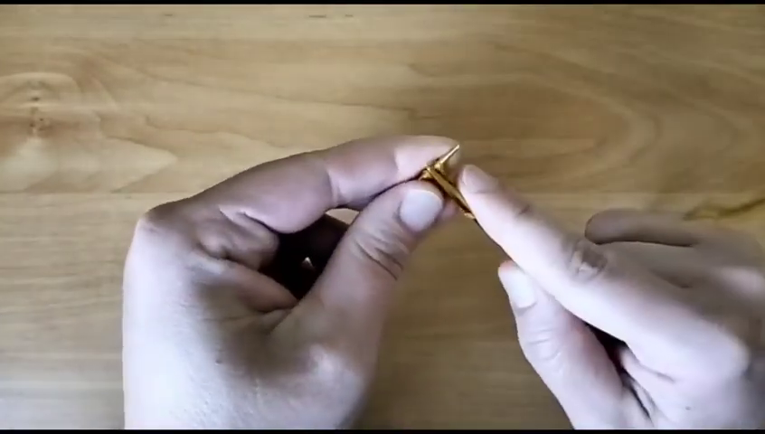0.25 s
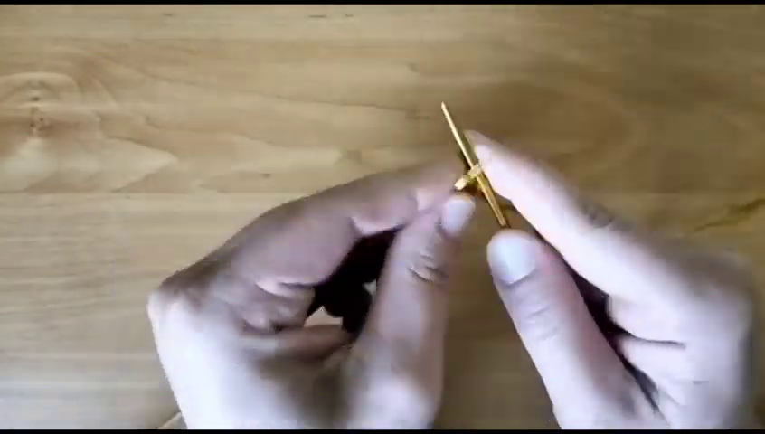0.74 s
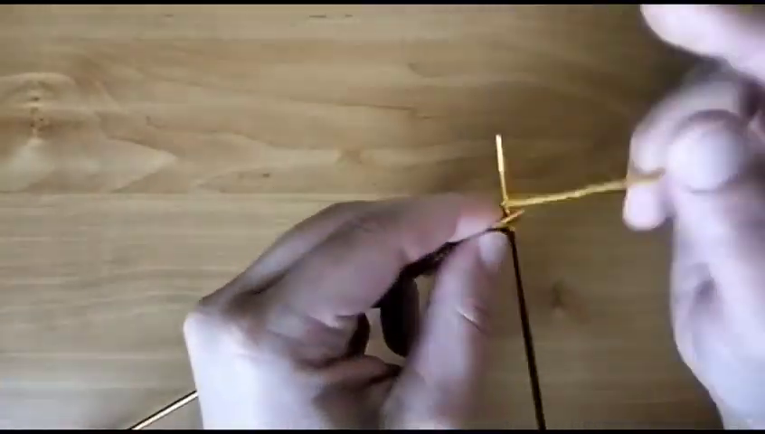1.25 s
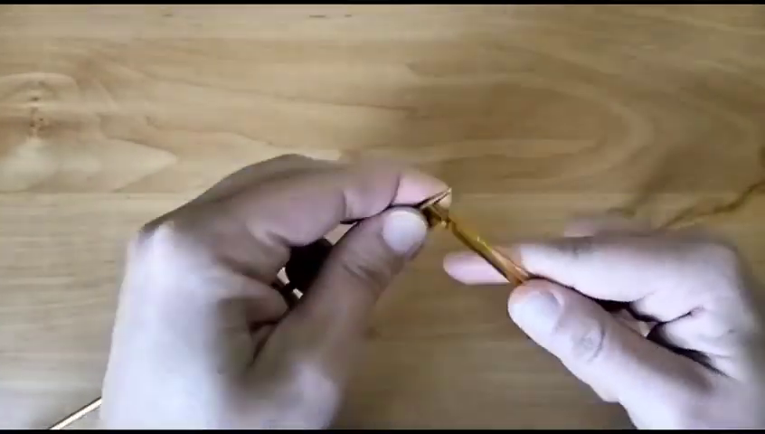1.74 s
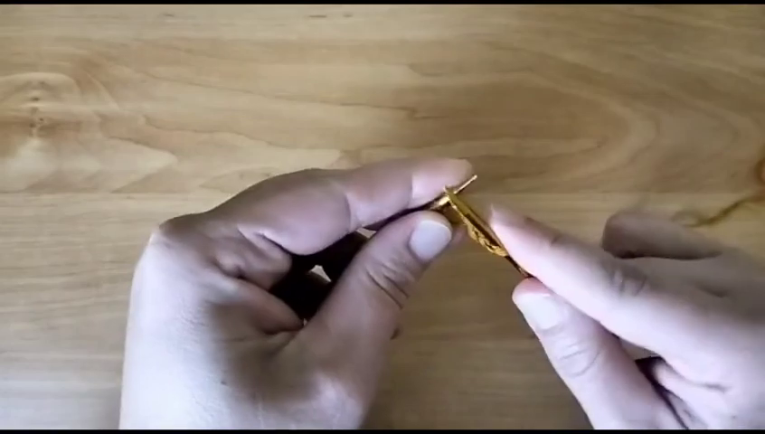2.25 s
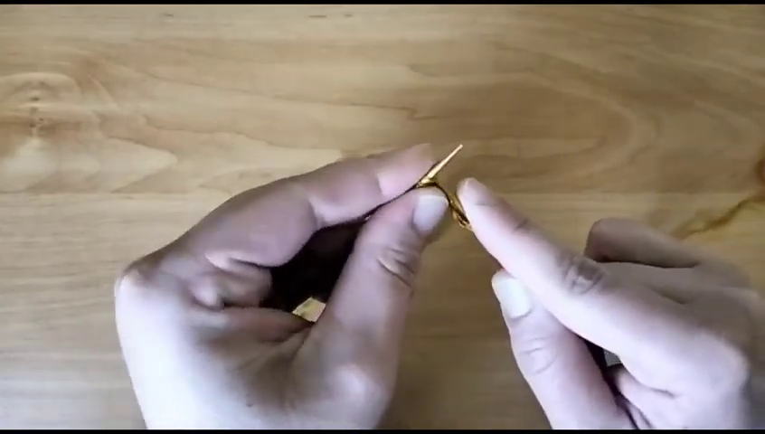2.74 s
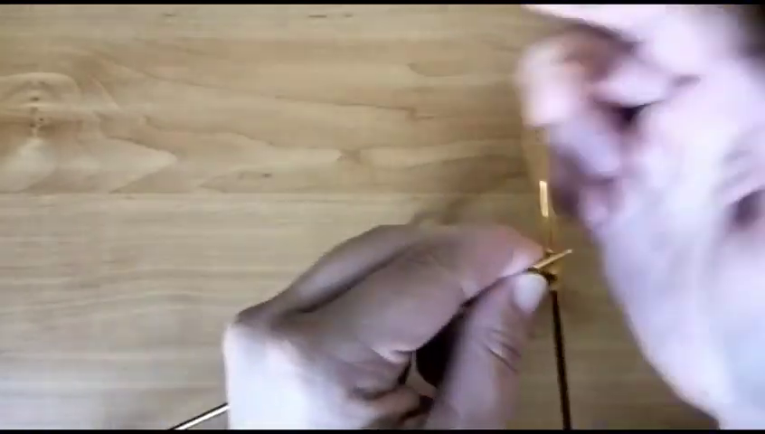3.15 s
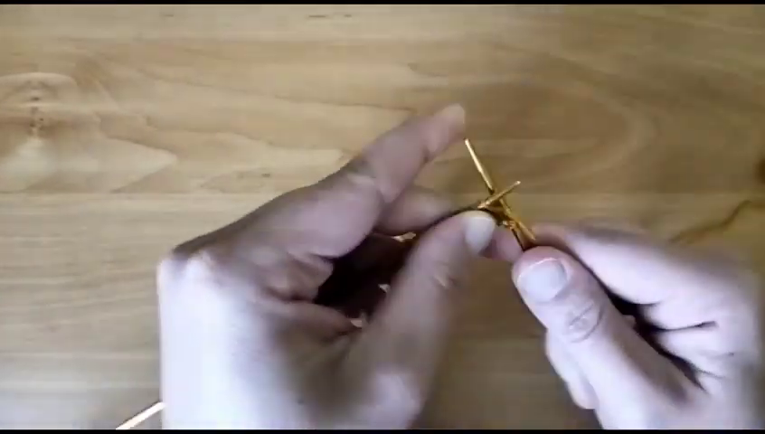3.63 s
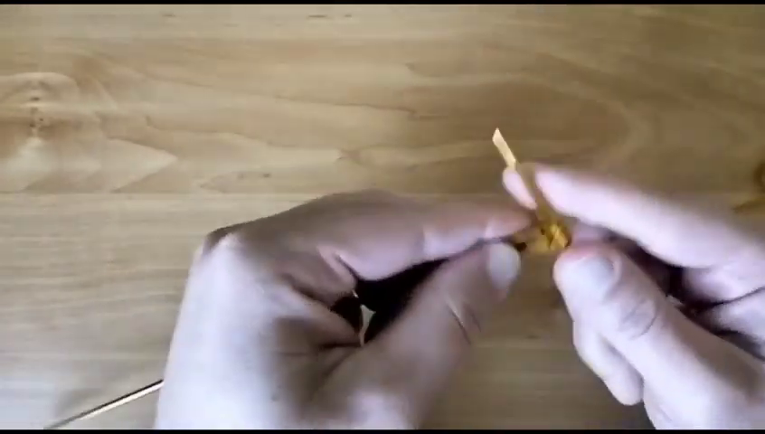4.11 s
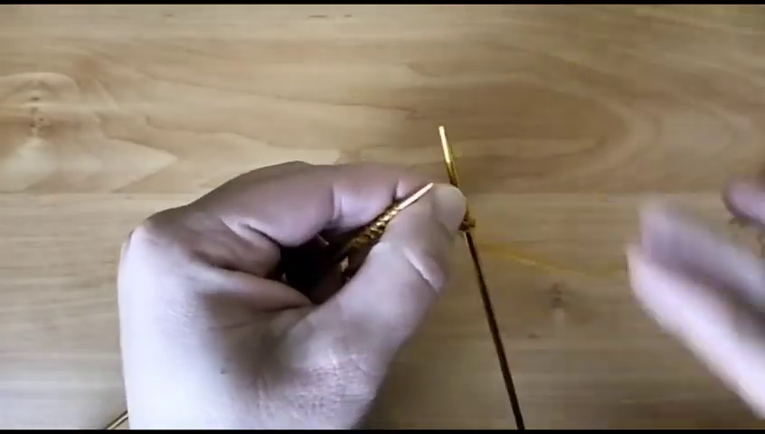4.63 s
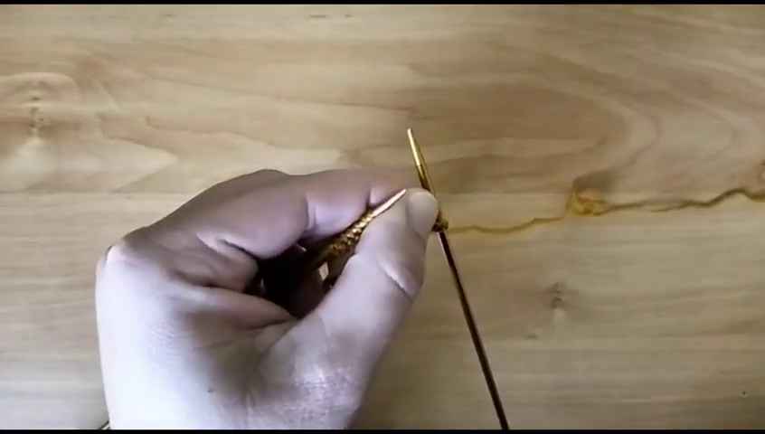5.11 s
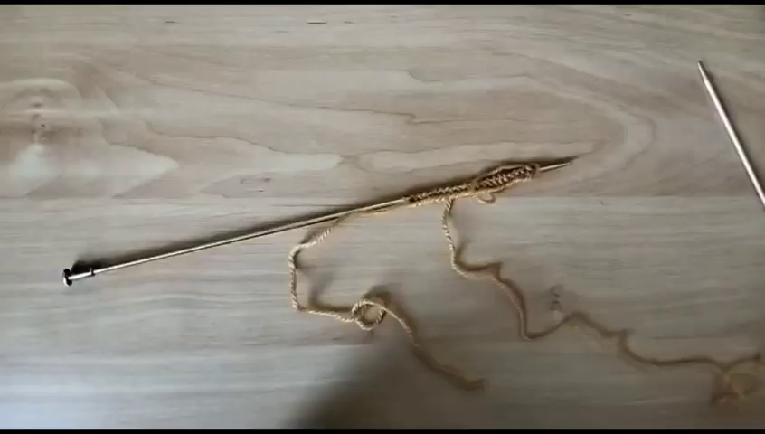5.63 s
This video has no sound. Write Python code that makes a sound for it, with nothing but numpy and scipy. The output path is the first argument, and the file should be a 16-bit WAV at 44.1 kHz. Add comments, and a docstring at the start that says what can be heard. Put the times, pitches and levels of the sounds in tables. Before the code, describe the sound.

Sparse bright needle clicks, short dry yarn rubs and a dull bump on the microphone stand, heard close over a wooden table.

```python
"""Two knitting needles click together over a wooden table: each blow is an impulse, dispersed along a rod
and filtered by resonances of needles, table and room. Yarn rubs, squeaks and snags by stick-slip friction;
wool brushes the skin and fingers shift as shaped noise, beside a short dull rattle. A hand bumps the
microphone stand, exciting damped modes, and leans on it, which sounds as a low wavering tone. Table
reflections and the diffuse field of a bare room answer clicks and rubbing, over faint room noise."""
import sys
import numpy as np
from scipy import signal
from scipy.fft import rfft, irfft
from scipy.io import wavfile
from scipy.ndimage import uniform_filter1d

SR = 44100
rng = np.random.default_rng(int(sys.argv[2]) if len(sys.argv) > 2 else 0)


def dump(signal):
    """Clip the signal to [-1, 1] and save it as 16-bit WAV at the path in sys.argv[1]."""
    limited = np.clip(np.atleast_2d(signal).T, -1, 1)
    pcm = np.round(limited * 32767).astype(np.int16)
    wavfile.write(sys.argv[1], SR, pcm)


N = 258967
TIME = np.arange(N) / SR  # s
HZ = np.fft.rfftfreq(8192, 1 / SR)  # frequency grid of the colour filters


def undb(db):
    """Decibel law: amplitude gain is ten to the power of level over twenty."""
    return 10 ** (np.asarray(db) / 20)


def unit(x):
    """Normalisation by mean power: scale to rms 1."""
    return x / np.sqrt(np.mean(x ** 2) + 1e-20)


def along(points, hz):
    """Logarithmic pitch scale: interpolate (frequency [Hz], value) points on a log axis."""
    f, value = np.transpose(points)
    return np.interp(np.log(hz + 1), np.log(f), value)


def convolve(x, response):
    """Linear superposition: pass a sound through an impulse response, keeping its length."""
    full = signal.fftconvolve(np.atleast_2d(x), np.atleast_2d(response), axes=1)
    return full[:, :np.shape(x)[-1]]


def colour(x, points, boost_db=0):
    """Minimum-phase filtering: a causal response made from a level outline by folding its cepstrum."""
    cepstrum = irfft(np.log(undb(along(points, HZ) + boost_db)))
    half = len(cepstrum) // 2
    cepstrum[1:half] *= 2
    cepstrum[half + 1:] = 0
    return convolve(x, irfft(np.exp(rfft(cepstrum))))


def band(x, lo_hz, hi_hz, order=2):
    """Band limitation: a Butterworth band-pass."""
    edges = [lo_hz, min(hi_hz, SR / 2 - 100)]
    return signal.sosfilt(signal.butter(order, edges, "band", fs=SR, output="sos"), x)


def spread(size, apart_hz):
    """Interaural coherence: stereo noise whose bass is alike on both sides and whose treble is not."""
    mid, side = rfft(rng.standard_normal((2, size)))
    hz = np.fft.rfftfreq(size, 1 / SR)
    alike = 1 / (1 + (hz / apart_hz) ** 2)
    opposed = np.array([[1], [-1]]) * side * np.sqrt(1 - alike)
    return irfft(mid * np.sqrt(1 + alike) + opposed, size) / np.sqrt(2)


def walk(rate):
    """Random modulation: straight lines join normal random values, `rate` of them a second."""
    knots = rng.standard_normal(size=2000)
    return np.interp(TIME * rate, np.arange(len(knots)), knots)


def swell(length, size):
    """Stroke envelope: a quick rise, a broad top and a slower fall within a length of time."""
    progress = np.clip(TIME[:size] / length, 0, 1)
    return np.abs(np.sin(np.pi * progress ** 0.3)) ** 0.54


def hold(s, length, rise_s, fall_s):
    """Attack and release: a straight rise, a hold until the length is over, then exponential decay."""
    rise = np.clip((TIME - s) / rise_s, 0, 1)
    return rise * np.exp(-np.maximum(TIME - s - length, 0) / fall_s)


def add(track, s, sound):
    """Superposition of events: mix a sound in at a time."""
    start = max(int(s * SR), 0)
    part = np.atleast_2d(sound)[:, :N - start]
    track[:, start:start + part.shape[1]] += part


def bend(x, lag_s):
    """Dispersion of bending waves in a thin rod: treble arrives first, bass later (lag_s at 2 kHz)."""
    hz = np.fft.rfftfreq(len(x), 1 / SR)
    return irfft(rfft(x) * np.exp(-4j * np.pi * lag_s * np.sqrt(2000 * hz)), len(x))


# resonances of the whole sound, from needles, table and room:
# (frequency [Hz], width [Hz], relative level [dB])
RESONANCES = [(123.5, 15, 4.5), (260.5, 21, 8), (417, 4.8, 0), (672.3, 41, -2.5), (978, 12, 1.5),
              (1209, 45, 2), (1510, 7.3, -3), (1603, 34, -0.5), (1923, 50, -2), (2137, 50, 1.5),
              (2300, 76, 0.5), (2454, 44, -0.5), (2887, 190, -8.5), (3070, 18, -14), (3147, 35, -5.5),
              (3363, 30, 0), (3765, 130, -6), (4746, 11, -3), (5080, 44, -7)]


def ring(ring_db):
    """Resonance: gain in dB from summed Lorentzian power peaks standing on a flat response."""
    peaks = 0
    for hz, width, db in RESONANCES:
        peaks = peaks + undb(db + ring_db) ** 2 / (1 + (2 * (HZ - hz) / width) ** 2)
    return 10 * np.log10(1 + peaks)


# needle clicks: (time [s], level [dB], hollow body level [dB], bright snap level [dB],
# left minus right [dB], level sent to the room [dB], favoured pitch [Hz], ring level [dB]);
# body, snap and room levels are relative to the click
CLICKS = [(0.781, -26.5, -23.5, -26, 0.5, -0.5, 2340, 16.5),
          (1.0592, -10.5, -22.5, -21, 2.5, 2.5, 1620, 11), (1.1554, -16.5, -17, -17, 0, 0.5, 2100, 6.5),
          (2.003, -19, -26, -20, -1, -3.5, 2980, 5), (2.9655, -35, -24, -35, 2, -2, 2280, 14.5),
          (3.1939, -11, -21, -18.5, 2.5, 2.5, 2320, 12.5), (3.277, -17.5, -17.5, -25, 0.5, 3.5, 2150, 6),
          (4.054, -17, -20, -22.5, -2, -0.5, 3100, 5), (4.4233, -11.5, -26.5, -24, -1, -2.5, 1800, 7.5),
          (4.645, -10.5, -22.5, -18, 2, -0.5, 2190, 14.5), (4.7632, -17, -20, -18.5, -0.5, -1, 3400, 6.5),
          (4.796, -23, -22, -30, -1, -3.5, 3000, 0)]
# spectral outline of a click: (frequency [Hz], level [dB])
CLICK_COLOUR = [(100, -12.5), (250, -13), (500, -4.5), (1000, -4), (1600, -2.5), (2300, -2), (3300, -3),
                (5000, -8.5), (6500, -15), (8300, -23), (10500, -16.5), (12500, -23), (15500, -33.5)]
SLIDE_S = 0.0073  # the tip slides this long before it slips


def needles(mid_db=-13, snap_db=-1, beam_db=-1, scrape_db=-12, scrape_s=0.0038,
            favour_db=2.5, favour_octaves=0.24, size=3000):
    """Impact excitation: a tip slides, slips and strikes; returns the sounds to the table and to the walls."""
    near, far, t = np.zeros((2, N)), np.zeros((1, N)), TIME[:size]
    for s, db, body, snap, pan_db, room_db, favoured_hz, ring_db in CLICKS:
        scrape, slide = rng.standard_normal((2, size))
        strike = bend(unit(signal.unit_impulse(size)), lag_s=0.0008056)
        push = strike + undb(scrape_db) * unit(scrape * np.exp(-t / scrape_s))
        # the point of contact favours one range of pitch; a tight grip damps the ring
        octaves_away = np.log2((HZ + 1) / favoured_hz)
        contact = favour_db * np.exp(-(octaves_away / favour_octaves) ** 2)
        blow = colour(push, CLICK_COLOUR, ring(ring_db) + contact)
        # where the needle is held decides how hollow and how bright the click is
        hollow = undb(db + body) * unit(band(blow, 90, 900))
        middle = undb(db + mid_db) * unit(band(blow, 1200, 5200))
        bright = undb(db + snap + snap_db) * unit(band(blow, 5200, SR / 2))
        click = hollow - middle + bright  # neighbouring bands have opposite polarity
        # the bright snap beams at the microphone more than at the walls
        beam = undb(beam_db) * bright
        add(near, s, (click + beam) * undb(np.array([[pan_db], [-pan_db]]) / 2))
        add(far, s, click * undb(room_db))
        # friction swells up to the slip
        rise = (t / SLIDE_S) ** 2 * (t < SLIDE_S)
        add(near, s - SLIDE_S, undb(db + mid_db) * unit(colour(slide, CLICK_COLOUR)) * rise)
    return near, far


# yarn strokes along the needles: (time [s], length [s], level [dB], brightness [dB/octave])
STROKES = [(0, 0.052, -35.5, 2.5), (0.047, 0.064, -37.5, -0.5), (.34, 0.038, -55.5, -10),
           (0.835, 0.079, -51.5, -7), (0.899, 0.04, -37.5, 1), (1.278, 0.051, -36.5, 1.5),
           (1.322, 0.14, -39.5, -1), (1.391, 0.065, -39.5, -1), (1.461, 0.13, -45, -2.5),
           (1.611, 0.02, -51.5, -1), (3.446, 0.24, -44, 3), (3.691, 0.038, -39.5, 0.5),
           (4.993, 0.035, -54, -1.5)]
# spectral outline of the rubbing: (frequency [Hz], level [dB])
YARN_COLOUR = [(100, -26.5), (250, -17), (500, -9), (1000, -0.5), (1600, 0.5), (2300, 0.5), (3200, -5),
               (4500, -12.5), (6500, -24), (15000, -32)]


def yarn(grain_db=5.0, catch_db=3.0, ring_db=4, size=12000):
    """Stick-slip friction: fibres give dense, tiny, uneven pushes to the same resonances as the clicks."""
    out, resonance = np.zeros((1, N)), ring(ring_db)
    octaves = np.log2(np.clip(HZ, 300, 8000) / 2000)  # brightness tilts about 2 kHz
    for s, length, db, bright_db in STROKES:
        grain = undb(grain_db * np.minimum(rng.exponential(size=size), 5))
        slips = rng.standard_normal(size) * grain
        rub = unit(colour(slips, YARN_COLOUR, resonance + bright_db * octaves))
        add(out, s, undb(db) * swell(length, size) * rub)
    return out * undb(catch_db * walk(81))


# faint squeaks of tight yarn: (time [s], length [s], level [dB], start pitch [Hz], end pitch [Hz])
SQUEAKS = [(0.192, 0.11, -59.5, 2092, 1815), (1.536, 0.123, -54, 958, 1004)]


def squeaks(waver=0.021, stutter_db=4, size=12000):
    """Friction-driven oscillation: tight yarn sings on the metal as a gliding, wavering, stuttering sine."""
    out = np.zeros((1, N))
    for s, length, db, start_hz, end_hz in SQUEAKS:
        glide = np.interp(TIME[:size], [0, length], [start_hz, end_hz])
        hz = glide * (1 + waver * walk(160)[:size])
        tone = np.sin(2 * np.pi * np.cumsum(hz) / SR)
        add(out, s, undb(db) * swell(length, size) * tone)
    return out * undb(stutter_db * walk(83))


# single fibres snagging on a tip: (time [s], level [dB])
SNAGS = [(0.904, -56.5), (1.734, -63), (2.165, -59), (2.981, -53.5), (3.699, -61), (3.864, -60),
         (4.135, -49.5), (4.182, -51.5)]
# spectral outline of wool fibres, for snags and brushing: (frequency [Hz], level [dB])
FIBRE_COLOUR = [(1000, -29.5), (4000, -8.5), (8000, -6.5), (11000, -1), (13500, -2), (15500, -4)]


def snags(decay_s=.003, size=2048):
    """Sudden release of tension: a fibre catches on a tip and lets go with a thin, decaying tick."""
    out = np.zeros((1, N))
    for s, db in SNAGS:
        burst = rng.standard_normal(size) * np.exp(-TIME[:size] / decay_s)
        add(out, s, undb(db) * unit(colour(burst, FIBRE_COLOUR)))
    return out


# fingers shifting on the work: (time [s], level [dB], length [s], centre pitch [Hz])
SHIFTS = [(0.179, -62.5, 0.16, 186), (0.244, -66, 0.072, 280), (0.331, -68.5, 0.17, 277),
          (.47, -60.5, 0.081, 140), (0.644, -55, 0.039, 558), (0.65, -44.5, 0.043, 188),
          (0.825, -48.5, .06, 213), (2.27, -52.5, 0.068, 437), (2.733, -66, 0.082, 900),
          (2.806, -52, 0.064, 221), (3.089, -65, 0.081, 170), (3.331, -37.5, 0.33, 154),
          (3.463, -38.5, 0.13, 450), (4.664, -48, 0.12, 130), (4.992, -60, 0.063, 502)]


def fingers(ratio=1.55, size=12000):
    """Band-limited friction noise: soft, low scuffs as the grip changes, each 0.27 s at most."""
    out = np.zeros((1, N))
    for s, db, length, hz in SHIFTS:
        scuff = unit(band(rng.standard_normal(size), hz / ratio, hz * ratio, order=3))
        add(out, s, undb(db) * swell(length, size) * scuff)
    return out


# short dull rattles: (time [s], level [dB])
RATTLES = [(5.711, -46.5)]
# spectral outline of a rattle: (frequency [Hz], level [dB])
RATTLE_COLOUR = [(100, -26), (400, 0), (1000, 5), (2000, -7.5), (4000, -19), (8000, -28), (15000, -27)]


def rattles(decay_s=0.016, length_s=0.0218, size=2048):
    """Exponential decay, truncated: a short dull rattle of noise decays and ends abruptly."""
    out, t = np.zeros((2, N)), TIME[:size]
    stop = np.clip((length_s - t) * 1000, 0, 1)  # fades over the last millisecond
    for s, db in RATTLES:
        rattle = spread(size, apart_hz=1800) * np.exp(-t / decay_s) * stop
        add(out, s, undb(db) * unit(colour(rattle, RATTLE_COLOUR)))
    return out


# wool brushing over the fingers as the hands move: (time [s], length [s], level [dB])
BRUSHES = [(0.0, 0.26, -74), (0.89, 0.19, -64), (1.25, 0.62, -71.5), (1.78, 0.16, -67.5), (2.075, .1, -53),
           (2.31, .12, -77), (2.98, 0.34, -66.5), (3.46, 0.41, -67), (3.87, .14, -71), (4.12, 0.15, -69),
           (4.95, 0.61, -76)]
# each brush starts quickly and fades over its length as the hand slows
BRUSH_RISE_S, BRUSH_FADE_DB = 0.015, -10.5


def fibres(grain_db=3.5, flicker_db=2.0):
    """Broadband friction noise: wool on skin gives a thin, grainy hiss for each move of the hands."""
    grain = undb(grain_db * np.minimum(rng.exponential(size=N), 6))
    hiss = rng.standard_normal((2, N)) * grain
    pressure = 0
    for s, length, db in BRUSHES:
        fade_db = BRUSH_FADE_DB * np.clip((TIME - s) / length, 0, 1)
        pressure = pressure + undb(db + fade_db) * hold(s, length, BRUSH_RISE_S, BRUSH_RISE_S)
    return unit(colour(hiss, FIBRE_COLOUR)) * pressure * undb(flicker_db * walk(44))


# bumps on the stand: (time [s], level [dB], push length [s])
BUMPS = [(0.663, -59, 0.0088), (1.062, -52.5, 0.0017), (3.336, -35, 0.0032), (3.459, -25, 0.0045),
         (3.81, -43, 0.013), (4.15, -52, 0.0093), (4.655, -45.5, 0.0052), (4.719, -50, 0.0051)]
# modes of the stand: (frequency [Hz], decay time T60 [s], relative level [dB])
STAND_MODES = [(79.87, 0.52, 6), (98, 0.18, 4.5), (115, 0.45, 3.5), (213.2, 0.32, 0.5)]
# the hand leans on the stand: (time [s], length [s], level [dB])
LEANS = [(3.457, 0.17, -26.5), (3.689, 0.058, -40.5), (3.785, .13, -52), (4.116, 0.082, -46)]
# the shudder builds while the hand leans and dies once it lets go
SHUDDER_HZ, SHUDDER_RISE_S, SHUDDER_FALL_S = 46.4, 0.025, 0.025


def stand(waver=0.035, size=22000):
    """Modal vibration: soft half-sine pushes ring damped modes; a lower shudder sounds while the hand leans."""
    out, t = np.zeros((1, N)), TIME[:size]
    modes = 0
    for hz, t60, db in STAND_MODES:
        modes = modes + undb(db) * np.exp(-np.log(1000) * t / t60) * np.sin(2 * np.pi * hz * t)
    for s, db, push_s in BUMPS:
        push = np.sin(np.pi * np.clip(t / push_s, 0, 1))
        add(out, s, undb(db) * convolve(modes, push / push.sum()))
    phase = 2 * np.pi * np.cumsum(SHUDDER_HZ * (1 + waver * walk(25))) / SR
    leaning = 0
    for s, length, db in LEANS:
        leaning = leaning + undb(db) * hold(s, length, SHUDDER_RISE_S, SHUDDER_FALL_S)
    return out + np.sqrt(2) * np.sin(phase) * leaning


# first echoes from the table and things near by: (left delay [ms], right delay [ms], relative level [dB])
ECHOES = [(2.2066, 2.273, -0.5), (2.648, 2.5, -13.5), (5.239, 5.38, -6), (8.48, 6.6, -17),
          (23.42, 9.3, -15.5)]


def near_field(direct_db=-10, dull_hz=5500, scatter_db=-7, scatter_s=0.0052, size=2048):
    """Reflection and scattering: direct sound, then duller echoes off the table and scatter from the hands."""
    hz, t = np.fft.rfftfreq(size, 1 / SR), TIME[:size]
    spectrum = 0
    for left, right, db in ECHOES:
        delay_s = np.array([[left], [right]]) / 1000
        spectrum = spectrum + undb(db) * np.exp(-2j * np.pi * hz * delay_s)
    echoes = irfft(spectrum)
    scatter = unit(rng.standard_normal((2, size)) * np.exp(-t / scatter_s)) / np.sqrt(size)
    reflected = band(echoes + undb(scatter_db) * scatter, 60, dull_hz, order=1)
    return (reflected + undb(direct_db) * signal.unit_impulse(size)) / np.sqrt(2)


# reverberation time of the room: (frequency [Hz], T60 [s])
ROOM_T60 = [(100, 0.13), (400, 0.5), (1000, 0.45), (2200, 0.36), (5000, 0.39), (9000, 0.34), (15000, 0.22)]


def walls(early_db=3, early_s=0.051, build_s=0.0099, size=40000):
    """Reverberation: a diffuse field builds up, is strong early and decays at a rate set by frequency."""
    t, hz = TIME[:size], np.fft.rfftfreq(size, 1 / SR)
    noise = rfft(spread(size, apart_hz=670))
    centres = [f for f, _ in ROOM_T60]
    tail = 0
    # overlapping bands, each with its own decay
    for share, (_, t60) in zip(np.eye(len(centres)), ROOM_T60):
        part = irfft(noise * along(list(zip(centres, share)), hz))
        tail = tail + part * np.exp(-np.log(1000) * t / t60)
    build = 1 - np.exp(-(t / build_s) ** 2)
    early = 1 + undb(early_db) * np.exp(-t / early_s)
    spectrum = rfft(tail * build * early)
    # a diffuse field carries about the same energy in every narrow band
    spectrum = spectrum / np.sqrt(uniform_filter1d(np.abs(spectrum) ** 2, size=45))
    return unit(irfft(spectrum) * (1 - (t / t[-1]) ** 2)) / np.sqrt(size)


# spectral outline of the room noise: (frequency [Hz], level [dB])
AIR_COLOUR = [(25, -11), (45, -1.5), (80, -5), (120, 5), (170, -8), (260, -3.5), (500, -9), (1000, -14.5),
              (2000, -18.5), (4000, -26.5), (8000, -35), (13000, -28.5)]
AIR_DB = -67


def air(swell_db=1):
    """Stationary background noise: a faint coloured stereo noise whose level wanders slightly."""
    return unit(colour(spread(N, apart_hz=483.8), AIR_COLOUR)) * undb(AIR_DB + swell_db * walk(2.3))


def scene(room_db=-3, rub_room_db=-7):
    """Direct and reverberant fields: clicks and rubbing arrive over the table and again from the walls."""
    table, room = near_field(), walls()
    near, far = needles()
    rubbing = yarn() + squeaks() + snags() + fingers()
    direct = convolve(near + rubbing, table)
    echo = convolve(undb(room_db) * far + undb(rub_room_db) * rubbing, room)
    return direct + echo + rattles() + fibres() + stand() + air()


TOP_HZ = 15800


def record(dry):
    """Band limits and saturation: drop the deepest bass, round the highest peaks, cut the top."""
    thin = signal.sosfilt(signal.butter(6, 35, "high", fs=SR, output="sos"), dry)
    rounded = thin / (1 + (thin / .9) ** 6) ** (1 / 6)
    return signal.sosfilt(signal.ellip(8, .2, 70, TOP_HZ, fs=SR, output="sos"), rounded)


dry = scene()
out = record(dry)
dump(out)
```